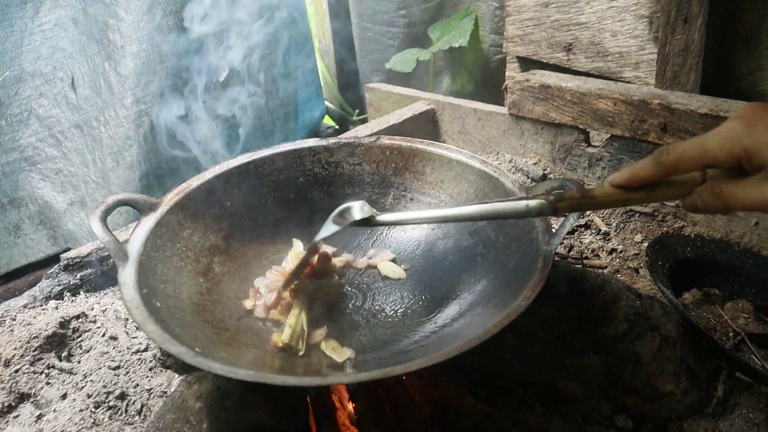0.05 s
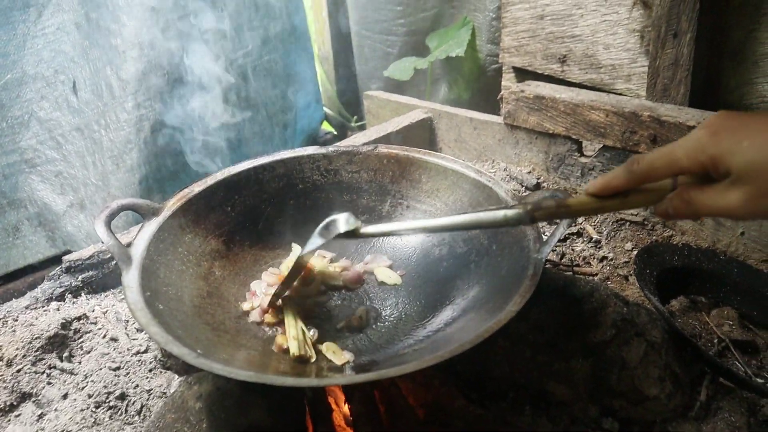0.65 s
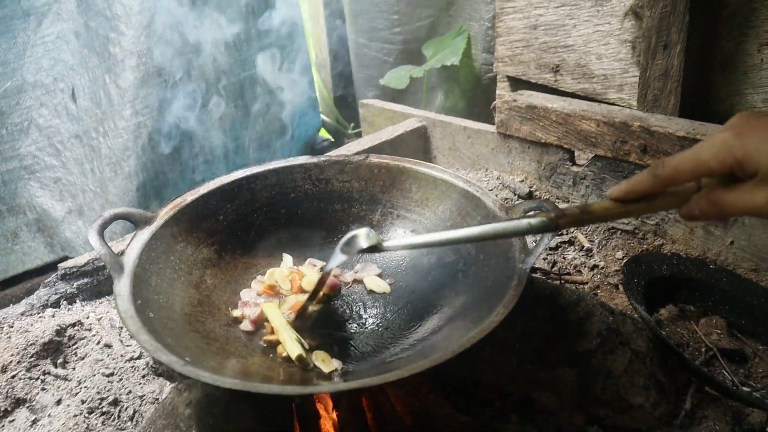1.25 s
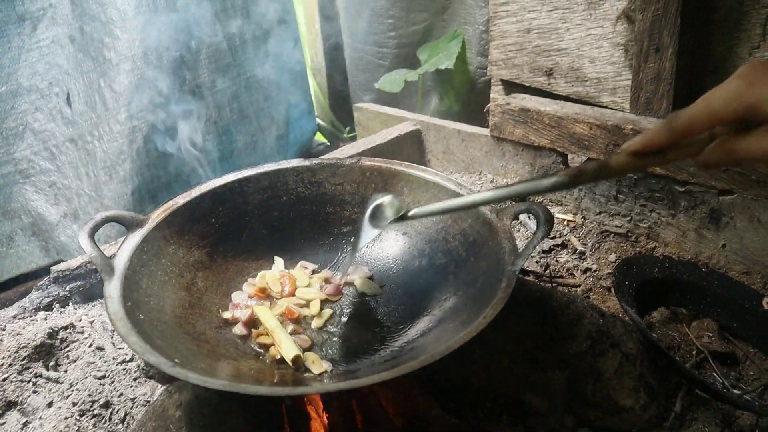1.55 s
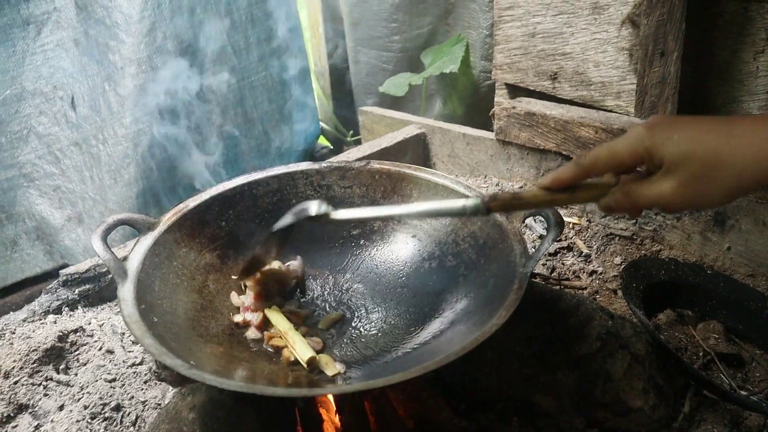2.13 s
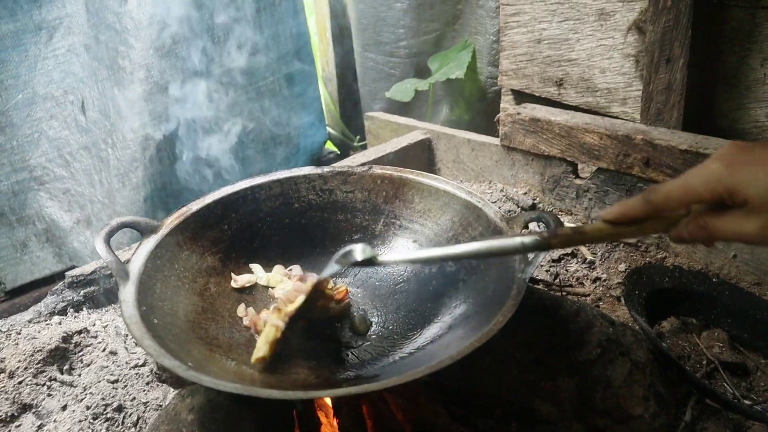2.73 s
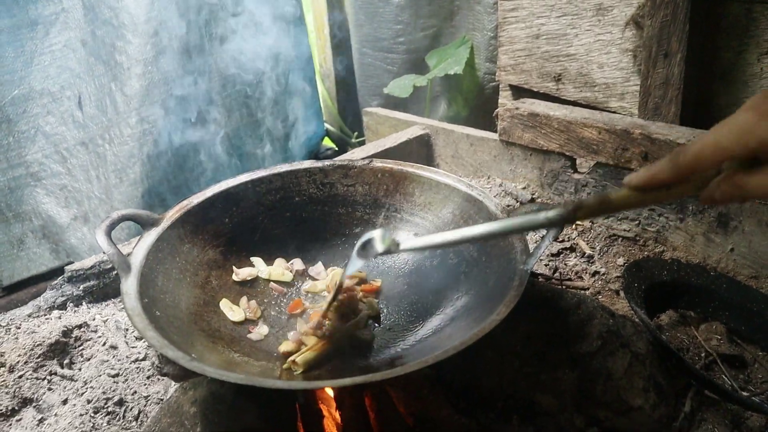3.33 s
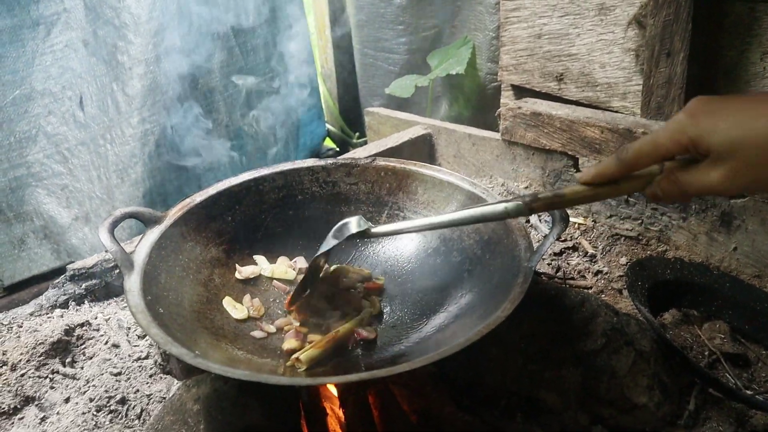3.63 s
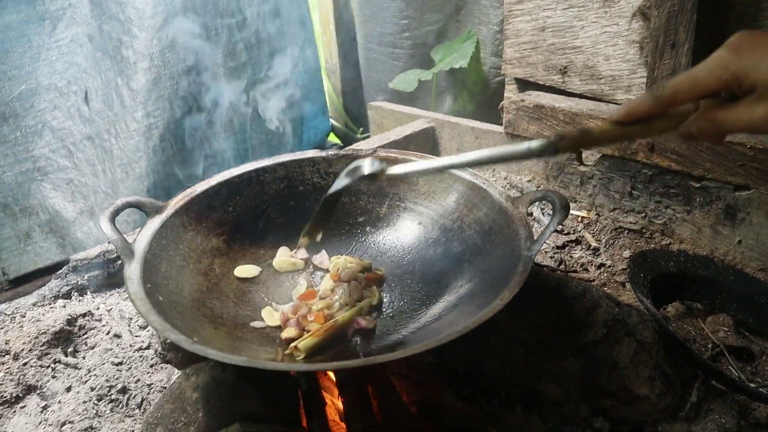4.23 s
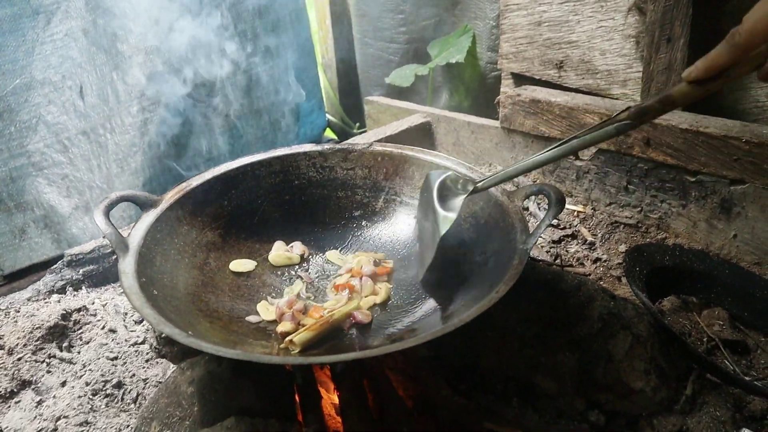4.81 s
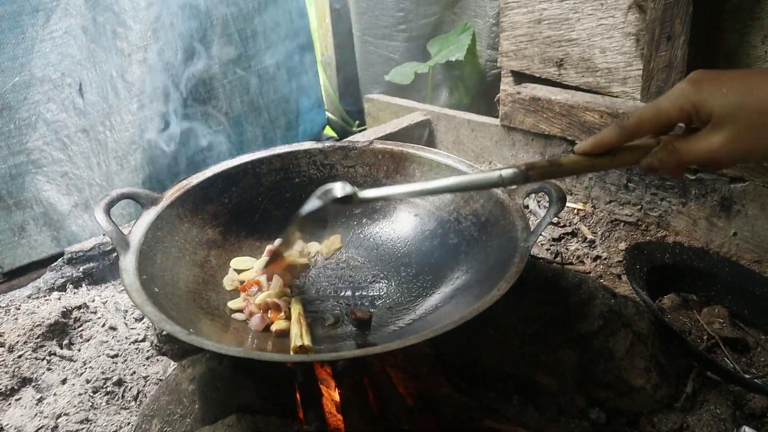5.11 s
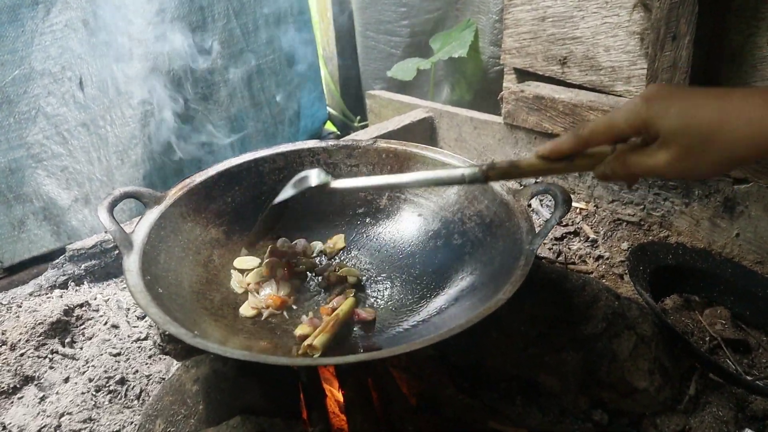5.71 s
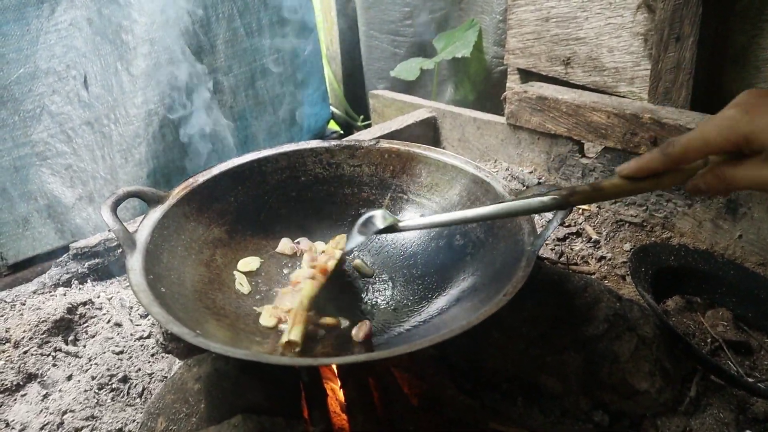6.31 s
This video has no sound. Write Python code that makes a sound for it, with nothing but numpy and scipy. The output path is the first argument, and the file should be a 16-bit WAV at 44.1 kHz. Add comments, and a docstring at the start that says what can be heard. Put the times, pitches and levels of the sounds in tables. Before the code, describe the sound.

Food sizzles steadily in hot oil in a wok while a metal spatula knocks and scrapes against it now and then.

```python
"""In an open hut kitchen, food sizzles in hot oil in a cast wok over a wood fire.
Tiny steam bubbles burst by the thousand, and now and then a drop of water spits.
A long metal spatula knocks on the wok, scrapes along its wall and catches, so that both ring.
The fire rumbles faintly below."""
import sys
import numpy as np
from scipy import signal
from scipy.fft import rfft, irfft, next_fast_len
from scipy.io import wavfile

SR = 44100
rng = np.random.default_rng(int(sys.argv[2]) if len(sys.argv) > 2 else 0)


def store_wav(level_fs):
    """Save 16-bit WAV to argv[1]."""
    pcm = np.round(np.clip(np.atleast_2d(level_fs), -1, 1) * 32767)
    wavfile.write(sys.argv[1], SR, pcm.T.astype(np.int16))


N = 284886
TIME = np.arange(N) / SR


# how hard the food fries: t/s, level/dB
FRYING_LEVELS = [(0.01, -24), (0.42, -22.0), (0.94, -24), (1.15, -23.5), (1.39, -25.5), (1.72, -26.5),
                 (1.93, -24), (2.13, -28), (2.92, -25.5), (3.06, -26.5), (3.42, -24.0), (3.63, -25.5),
                 (4.12, -24.5), (4.68, -27), (5.01, -26), (5.34, -28.5), (5.43, -29), (6.0, -26.5),
                 (6.28, -29.5), (6.46, -29)]
def frying_db():
    """The frying flares whenever food is turned onto hot metal."""
    return np.interp(TIME, *np.transpose(FRYING_LEVELS))


# tone of the bursting bubbles: f/Hz, level/dB
SIZZLE_TONE = [(150, -23), (320, -22), (420, -20.5), (800, -12.5), (1400, -10.5), (1900, -5), (2350, -8.5),
               (3100, -2), (4500, 1.5), (5500, 2.5), (6300, -5), (7800, 0.5), (9600, 1), (15500, -10)]
def sizzle(level_db=-1.04, flurry_s=0.0034, flurry_depth=.18, tick_db=-12):
    """Bubbles snap and ring over a fine froth, in flurries that start at once and die away."""
    starts = np.abs(clicks(220, spread_db=2.5, largest=4.0))
    flurries = signal.lfilter([1], [1, -np.exp(-1 / (flurry_s * SR))], starts)
    activity = (1 + flurry_depth * unit_power(flurries)) * from_db(.35 * drift(30))
    snaps = unit_power(clicks(9000 * activity, spread_db=2.0, largest=4.7))
    froth = rng.standard_normal(N)
    pops = bubbles(5000 * activity, cycles=4.5)
    oil = unit_power(shape_tone(activity * (snaps + 0.66 * pops + 0.64 * froth), SIZZLE_TONE))
    # the smallest droplets go off as lone, very short ticks
    ticks = unit_power(band_pass(clicks(260, spread_db=9.5, largest=1.8), 8500, 20000))
    return (oil + from_db(tick_db) * ticks) * from_db(level_db + frying_db())


def bubbles(per_s, cycles, sizes=16):
    """Each bursting bubble rings for a few cycles at a pitch set by its size."""
    bursts = clicks(per_s, spread_db=3.0)
    size_group = rng.integers(0, sizes, N)
    return unit_power(sum(hz * ring(bursts * (size_group == k), hz, cycles / hz)
                          for k, hz in enumerate(np.geomspace(1500, 15000, sizes))))


# the loudest spitting drops: t/s, peak level/dB
LOUD_DROPS = [(1.172, 0.5), (2.203, -8), (4.141, -3), (4.464, -8)]
def spits(per_s=3, above_frying_db=14.5, spread_db=1.5):
    """Water drops flash to steam with a bright snap; the small ones follow the frying level."""
    snap = band_pass(signal.unit_impulse(256), 5500, 12500, order=2)
    moments = rng.random(N) < per_s / SR
    small = moments * from_db(frying_db() + above_frying_db + spread_db * rng.standard_normal(N))
    loud = sum(place([from_db(db)], s) for s, db in LOUD_DROPS)
    return np.convolve(small + loud, snap / np.abs(snap).max())[:N]


def stirring():
    """Scrapes, judders and knocks each give three forces: on the touched spot, wok and spatula."""
    forces = [*scrapes(), *judders(), *knocks()]
    on_spot, on_wok, on_spatula = map(sum, zip(*forces))
    return crack(on_spot) + touched_spot(on_spot) + wok(on_wok) + spatula(on_spatula)


# spatula blows: t/s, force level/dB, knock f/Hz, bright metal level/dB, chatter time/s
BLOWS = [(.312, -15.5, 136, -28, .006), (.789, -23.5, 1500, -4, .0015), (0.866, -20.5, 2270, -1, .002),
         (1.1258, -3.5, 565, -1.5, 0.0099), (1.7864, -1, 810, 0.5, .01), (1.7938, -12, 1490, 10.5, 0.0059),
         (1.824, -15, 500, 1, .0023), (2.664, -8.5, 240, -16, .008), (3.423, -19.5, 226, -1, .014),
         (3.699, -21.5, 396, 0, 0.0052), (4.0635, -7.5, 880, -9, 0.00086), (4.562, -12.5, 376, -11, .0055),
         (4.8923, 3.5, 563, -3.5, 0.0051), (5.8254, 3.5, 990, -7, 0.0013), (5.9025, -1.5, 790, -9, .002),
         (6.2832, 3, 620, -5, 0.0055)]
def knocks(wok_db=-3, spatula_db=-7, chatter=0.14, size=4096):
    """The blade hits and chatters to rest; the barer the metal, the more the spatula sings."""
    for s, db, pitch_hz, metal_db, chatter_s in BLOWS:
        tap = signal.unit_impulse(size)
        rattle = tap + chatter * rng.standard_normal(size) * np.exp(-TIME[:size] / chatter_s)
        first_hit = from_db(db) * place(touch(tap, pitch_hz, metal_db), s)
        whole_hit = from_db(db) * place(touch(rattle / np.linalg.norm(rattle), pitch_hz, metal_db), s)
        yield whole_hit, first_hit * from_db(wok_db), first_hit * from_db(spatula_db + 0.93 * metal_db)


# spatula pushes: t/s, length/s, force level/dB, starting f/Hz, bright metal level/dB, wok level/dB
PUSHES = [(1.134, .11, -6.5, 541, -0.5, -9), (1.806, .16, -4.5, 410, 0, -16),
          (4.904, 0.069, -6.5, 660, 6, 4), (4.977, 0.11, 0, 520, 0, -3), (5.433, .085, -7, 821, 4, 4),
          (5.907, .055, -5.5, 440, 0, 0), (6.294, 0.08, -2, 661.5, -1, 0.5)]
def scrapes(level_db=-39.5, spatula_db=-8, fade_s=0.0055):
    """The blade presses on the wall, slides along it and lifts off."""
    age = TIME[:8192]
    for s, length, db, start_hz, metal_db, wok_db in PUSHES:
        pressure = np.interp(age, [0, length, length + 2 * fade_s], [1, 1, 0])
        pressure *= np.minimum(age / fade_s, 1)
        force = from_db(level_db + db) * place(pressure * grind(age, length, start_hz, metal_db), s)
        yield force, force * from_db(wok_db), force * from_db(spatula_db)


# tones of the sliding blade: multiple of the grinding pitch, level/dB
GRIND_TONES = [(.62, -10), (1, -4.5), (1.5, -7), (3.7, -1.5), (5.3, -2), (6.6, -6.5), (8.4, -12)]
def grind(age, length, start_hz, metal_db, pitch_fall=.2, squeal_db=-15, waver=0.0473):
    """The blade sticks and slips, and its tones glide down as it travels."""
    size = len(age)
    end_hz = start_hz * (1 - pitch_fall)
    pitch = np.interp(age, [0, length], [start_hz, end_hz])
    slips = clicks(6000, spread_db=1.5, largest=3.7)[:size]
    slips = unit_power(slips * from_db(4.1 * drift(130.5, size)))
    force = touch(slips, np.sqrt(start_hz * end_hz), metal_db, metal_top_hz=6160)
    for multiple, tone_db in GRIND_TONES:
        hz = multiple * pitch * (1 + waver * drift(302, size))
        grip = unit_power(from_db(3.4 * drift(63.0, size)))  # each tone catches and lets go on its own
        gain = from_db(squeal_db + tone_db + metal_db * (multiple > 2))
        force += grip * gain * np.sin(2 * np.pi * np.cumsum(hz) / SR)
    return force


# the blade catches: t/s, force level/dB, bounce f/Hz, bright metal level/dB
CATCHES = [(1.923, -14, 600, -4), (2.3463, -10, 610, -5), (2.662, -9, 594, -2), (2.683, -16.5, 580, -7),
           (5.058, -14.5, 642, -1)]
def judders(fade_s=.013, unevenness=.09, wok_db=-5, spatula_db=-8):
    """A catching blade makes a quick, nearly even run of bounces that fades out."""
    for s, db, bounce_hz, metal_db in CATCHES:
        gaps = (1 + unevenness * rng.standard_normal(16)) / bounce_hz
        ages = np.cumsum(gaps) - gaps[0]
        strengths = np.maximum(1 - ages / fade_s, 0)
        bounces = np.bincount(np.abs(ages * SR).astype(int), strengths, minlength=4096)
        force = from_db(db) * place(touch(bounces, bounce_hz, metal_db), s)
        yield force, force * from_db(wok_db), force * from_db(spatula_db)


def touch(jolts, pitch_hz, metal_db, width=2.025, metal_top_hz=10000):
    """The wall gives a hollow knock, pitched by where it is hit; bare metal adds a bright edge."""
    hollow = band_pass(jolts, pitch_hz / width, pitch_hz * width, order=2)
    return hollow + from_db(metal_db) * band_pass(jolts, 1450, metal_top_hz, order=2)


# tone of the blade meeting the wall: f/Hz, level/dB
CRACK_TONE = [(50, -3), (150, 13.5), (300, -3.5), (700, 11), (1300, 15), (2400, 13), (4500, 16.5),
              (5600, 5), (6500, 6), (9000, 16), (15000, 0)]
def crack(force):
    """Some sound goes straight into the air from where the blade touches."""
    return shape_tone(force, CRACK_TONE)


# notes of blade and wall pressed together: f/Hz, level/dB, ring time/s
SPOT_NOTES = [(216, -32, 0.15), (343, -20.5, 0.053), (559, -19.5, 0.055), (597, -14.5, 0.032),
              (710, -35.5, 0.0087), (804, -9, 0.012), (1077, -30.5, 0.16), (2925, -15.5, 0.0075),
              (4105, -8.5, 0.013), (4620, -12.5, 0.0095), (5340, -12, 0.027)]
def touched_spot(force):
    """Where blade and wall touch, their ringing dies quickly."""
    return ring_notes(force, SPOT_NOTES)


# the wok's own notes: f/Hz, level/dB, ring time/s
WOK_NOTES = [(490.4, -29, 0.29), (787, -40.5, 1.3), (1060, -32, 0.096), (1246, -27, 0.59), (1416, -39, .25),
             (1460, -32, 0.2), (3680, -45, .1), (4300, -39, 0.076), (5260, -48, .2)]
def wok(force):
    """The shaken wok rings on freely, like a dull bell."""
    return ring_notes(force, WOK_NOTES)


# the spatula's own notes: f/Hz, level/dB, ring time/s
SPATULA_NOTES = [(1485, -27.5, 0.22), (1664, -16.5, 0.059), (1917, -16, 0.16), (2060, -18, 0.023),
                 (2237, -19, 0.19), (2620, -24, 0.093), (3730, -24, .1), (4500, -22.5, 0.066)]
def spatula(force, shift_db=2.5, shifts_per_s=4):
    """The hand shifts its grip, so each touch brings out other notes of the spatula."""
    return sum(from_db(db) * ring(force * from_db(shift_db * drift(shifts_per_s)), hz, ring_s)
               for hz, db, ring_s in SPATULA_NOTES)


# tone of the wood fire: f/Hz, level/dB
FIRE_TONE = [(15, -6.5), (35, 2.5), (55, -1), (80, 4), (100, -11.5), (160, -32), (400, -42)]
def fire(level_db=-55):
    """The flames give a low, slightly unsteady rumble."""
    flicker_db = 2.0 * drift(6.42)
    return from_db(level_db + flicker_db) * unit_power(shape_tone(rng.standard_normal(N), FIRE_TONE))


def hut(x, echo_s=.13, echo_db=-13):
    """Planks and tarpaulin send back a faint, short wash of echoes."""
    age = TIME[:8192]
    echoes = rng.standard_normal(len(age)) * from_db(-60 * age / echo_s) * (age > .004)
    return x + from_db(echo_db) * signal.fftconvolve(x, echoes / np.linalg.norm(echoes))[:N]


def from_db(db):
    """Turn decibels into a number to multiply by."""
    return 10 ** (np.asarray(db) / 20)


def unit_power(x):
    """Scale a signal to an average power of 1."""
    return x / np.sqrt(np.mean(x ** 2) + 1e-20)


def drift(per_s, size=N):
    """A random wander, about 1 in size, that turns `per_s` times a second."""
    return unit_power(np.interp(TIME[:size] * per_s, np.arange(size), rng.standard_normal(size)))


def clicks(per_s, spread_db, largest=4.9):
    """Clicks at random moments: many small ones, a few large."""
    sizes = from_db(spread_db * np.minimum(rng.exponential(1, N), largest)) * rng.choice([-1, 1], N)
    return sizes * (rng.random(N) < per_s / SR)


def place(sound, s):
    """Set a short sound into silence, starting at `s` seconds."""
    return np.pad(sound, (round(s * SR), N))[:N]


def ring(force, hz, ring_s):
    """Each jolt starts a note that fades by 60 dB in `ring_s` seconds."""
    decay, angle = from_db(-60 / (ring_s * SR)), 2 * np.pi * hz / SR
    feedback = decay * np.cos(angle)
    return signal.lfilter([1, -feedback], [1, -2 * feedback, decay * decay], force + 1e-18)


def ring_notes(force, notes):
    """One force sets all the notes of an object ringing."""
    return sum(from_db(db) * ring(force, hz, ring_s) for hz, db, ring_s in notes)


def band_pass(x, low_hz, high_hz, order=1):
    """Keep the sound between two frequencies."""
    band = signal.butter(order, [low_hz, min(high_hz, .45 * SR)], "band", fs=SR, output="sos")
    return signal.sosfilt(band, x + 1e-18)


def shape_tone(x, tone):
    """Turn frequencies up or down along a curve of f/Hz, level/dB points."""
    size = 2 * next_fast_len(N // 2 + SR // 8)
    hz, db = np.transpose(tone)
    curve_db = np.interp(np.log(np.arange(size // 2 + 1) * SR / size + 1), np.log(hz), db)
    # fold the filter forward in time, so nothing sounds before its cause
    folded = irfft(np.log(from_db(curve_db)))
    folded[1:size // 2] *= 2
    folded[size // 2 + 1:] = 0
    return irfft(rfft(x, size) * np.exp(rfft(folded)))[..., :N]


def scene():
    """The wok stands straight ahead over the fire, alike in both channels."""
    return np.tile(sizzle() + spits() + hut(stirring()) + fire(), (2, 1))


def record(dry, cutoff_hz=15800):
    """The loudest peaks are clipped, and the highest treble is cut steeply."""
    treble_cut = signal.ellip(12, .1, 80, cutoff_hz, fs=SR, output="sos")
    return signal.sosfilt(treble_cut, np.clip(dry, -.95, .95))


dry = scene()
out = record(dry)
store_wav(out)
```